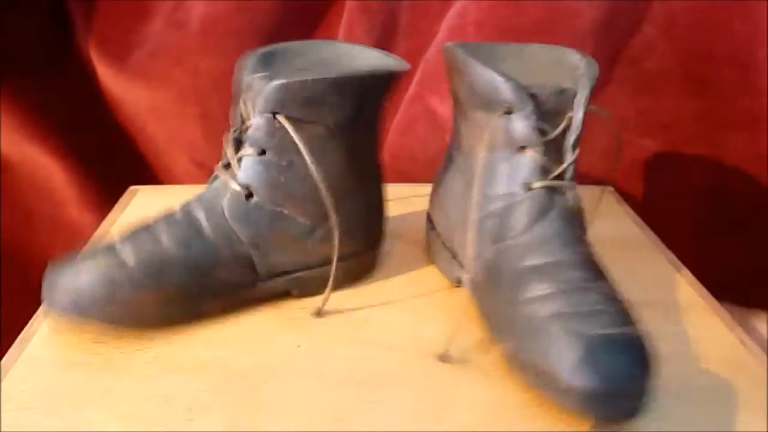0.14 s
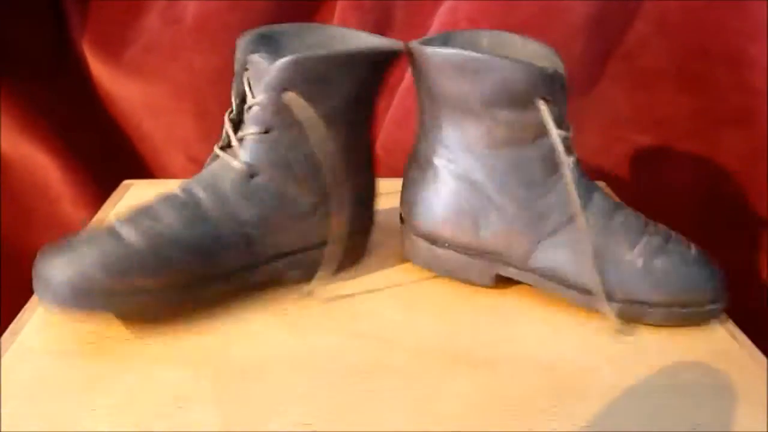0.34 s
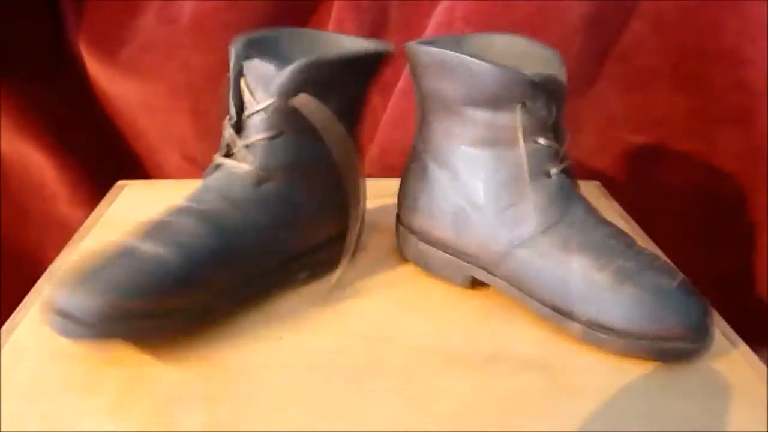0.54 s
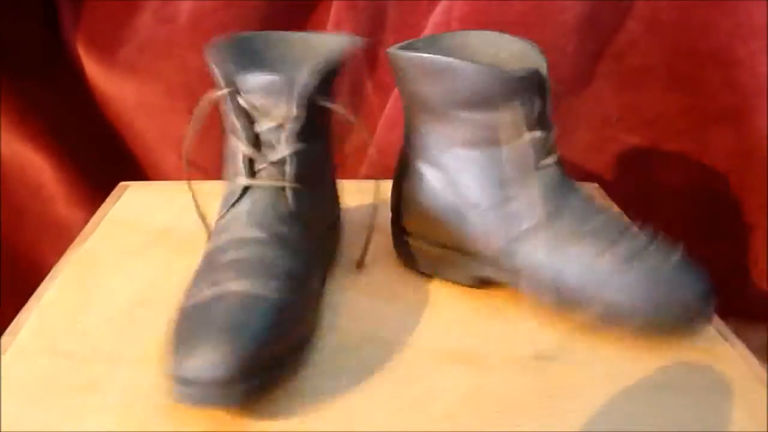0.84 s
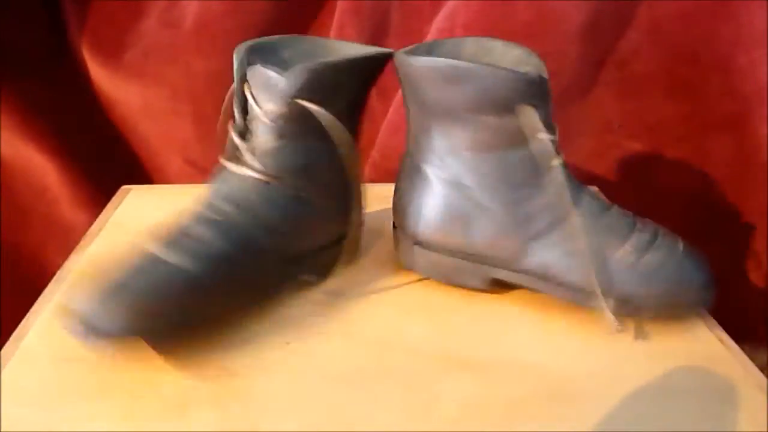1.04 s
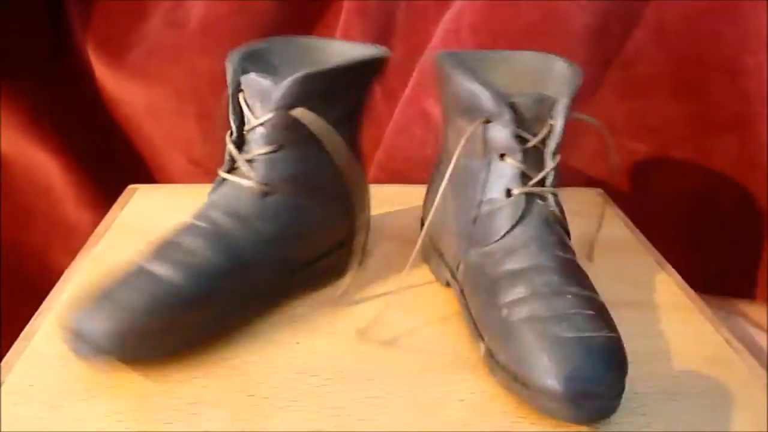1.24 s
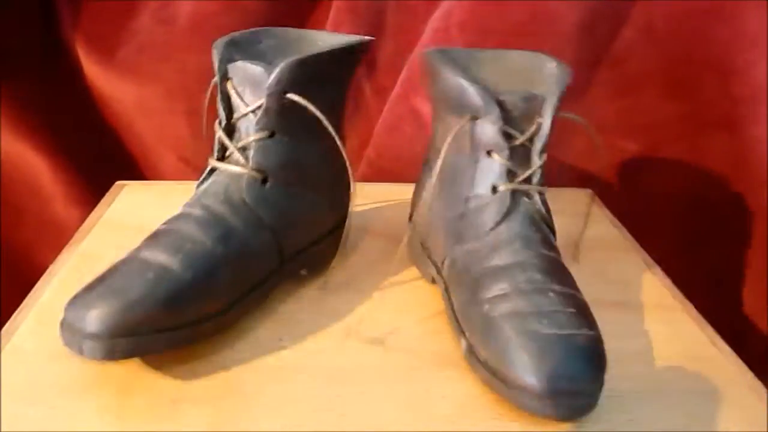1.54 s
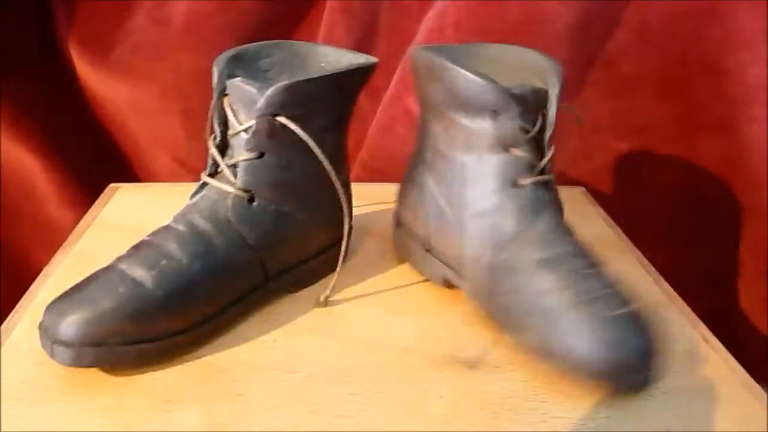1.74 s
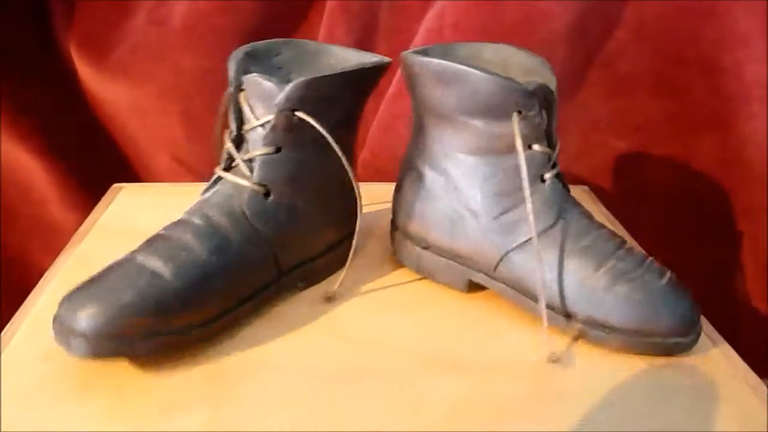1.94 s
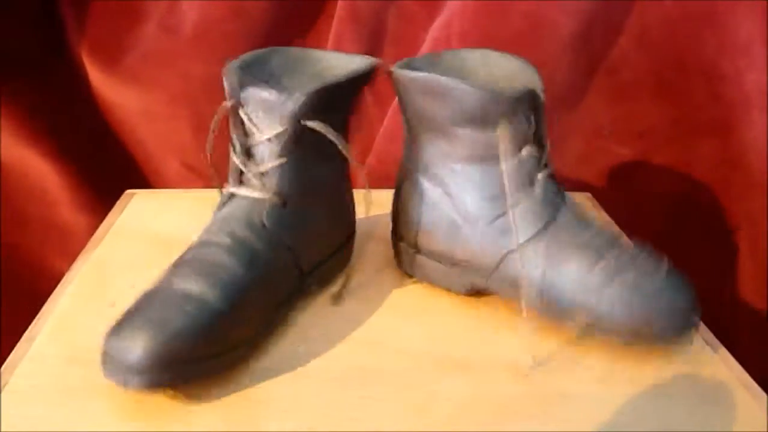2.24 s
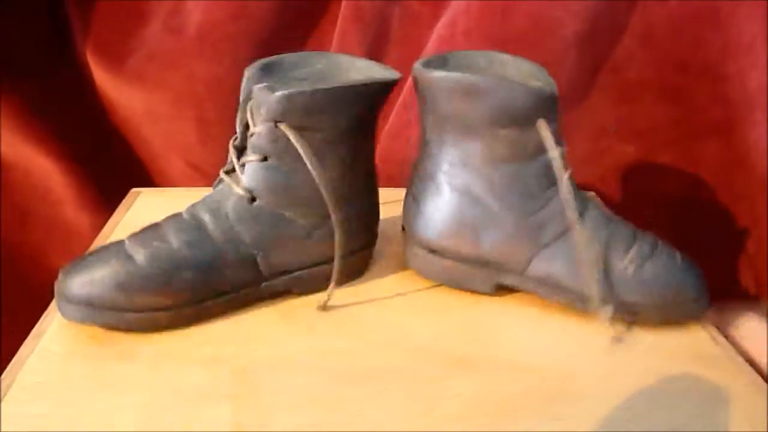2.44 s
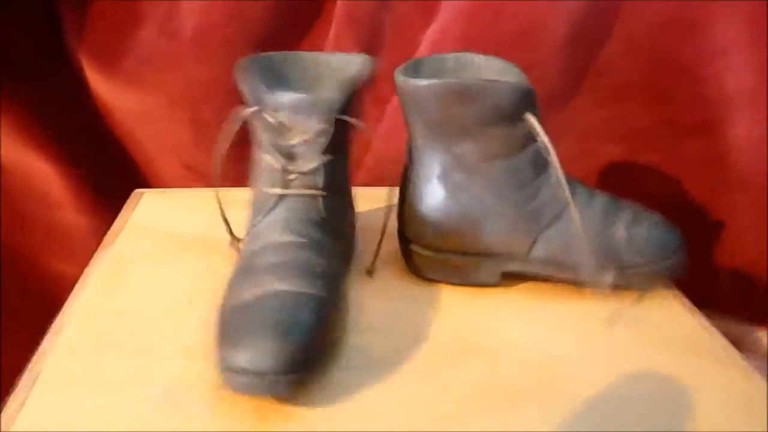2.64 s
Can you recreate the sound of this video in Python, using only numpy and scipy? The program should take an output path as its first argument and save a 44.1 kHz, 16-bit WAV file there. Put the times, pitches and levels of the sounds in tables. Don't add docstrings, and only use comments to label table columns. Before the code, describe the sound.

A wooden mechanical toy knocks and clatters on its hollow box: soft low bumps, sharper taps and loose rattles over creaky friction, nearly stopping late and restarting; close, slightly dull microphone, quiet room with light hiss.

```python
import sys
import numpy as np
from scipy import signal
from scipy.fft import rfft, irfft, next_fast_len
from scipy.io import wavfile

SR = 44100
rng = np.random.default_rng(int(sys.argv[2]) if len(sys.argv) > 2 else 0)


def natural_amplitude(level_db):
    exponent = np.asarray(level_db, float) / 20
    return 10 ** exponent


def put_to_file(sound):
    columns = np.atleast_2d(sound).T
    safe = np.clip(columns, -1, 1)
    whole_steps = np.round(safe * 32767)
    wavfile.write(sys.argv[1], SR, whole_steps.astype(np.int16))


N = 123039
SPREAD_DB = 4.5


def rms_one(x):
    return x / np.sqrt(np.mean(x ** 2) + 1e-20)


def ring(clicks, hz, t60):
    r = natural_amplitude(-60 / (t60 * SR))
    w = 2 * np.pi * hz / SR
    return signal.lfilter([0, np.sin(w)], [1, -2 * r * np.cos(w), r * r], clicks + 1e-18)


def click_train(start_s, gains):
    return np.bincount((start_s * SR).astype(int), gains, N)[:N]


def fading_clicks(start_s, gains, fade_s):
    return signal.lfilter([1], [1, -np.exp(-1 / (fade_s * SR))], click_train(start_s, gains))


def band_noise(source, low_hz, high_hz):
    band = signal.butter(1, [low_hz, high_hz], "band", fs=SR, output="sos")
    return signal.sosfilt(band, source)


def off_pitch_db(hz, favoured_hz, focus_db, reach_db):
    return -np.minimum(focus_db * np.log2(hz / favoured_hz) ** 2, reach_db)


# start in seconds, peak in dB, favoured pitch in
# Hz, length of push in seconds.
THUDS = [(0.0, -20, 440, 0.0022), (0.046, -8, 350, 0.0035), (0.065, -22.5, 340, 0.0023),
         (0.141, -12.5, 342, 0.0018), (0.154, -21.5, 297, 0.002), (0.27, -34, 347, 0.0028),
         (0.31, -26.5, 423, 0.0014), (0.38, -19, 336, 0.0046), (0.425, -25, 404, 0.0045),
         (0.491, -23.5, 409, 0.002), (0.509, -22, 435, 0.003), (0.523, -21.5, 417, 0.009),
         (0.551, -12, 350, 0.0035), (0.574, -12.5, 350, 0.001), (0.611, -23, 363, 0.003),
         (0.629, -24, 340, 0.0022), (0.674, -32.5, 234, 0.003), (0.7, -23, 357, 0.0015),
         (0.8, -34, 385, 0.003), (0.819, -20, 416, 0.0039), (0.864, -20.5, 377, 0.003),
         (0.875, -14.5, 326, 0.0059), (0.889, -16, 404, 0.0033), (0.903, -23.5, 373, 0.003),
         (0.913, -17.5, 455, 0.0023), (0.929, -14.5, 468, 0.0014), (0.964, -6.5, 350, 0.0034),
         (0.978, -13.5, 358, 0.0038), (1.051, -22, 400, 0.0075), (1.103, -25.5, 372, 0.0016),
         (1.12, -11, 528, 0.0039), (1.138, -11.5, 345, 0.0048),
         (1.183, -8, 333, 0.0043), (1.207, -12, 375, 0.0011), (1.255, -19, 385, 0.0056),
              (1.27, -15.5, 411, 0.0054), (1.286, -16, 289, 0.0052), (1.297, -13, 417, 0.0051),
              (1.355, -21, 443, 0.0072), (1.367, -14.5, 392, 0.0064), (1.388, -13.5, 337, 0.0021),
              (1.405, -21.5, 345, 0.0045), (1.488, -17, 426, 0.0013), (1.512, -17.5, 352, 0.004),
              (1.546, -6.5, 342, 0.0022), (1.565, -16, 358, 0.0054), (1.586, -16.5, 383, 0.0033),
              (1.656, -16.5, 340, 0.003), (1.671, -6.5, 384, 0.0043), (1.692, -13.5, 414, 0.0036),
              (1.788, -23.5, 396, 0.0044), (1.932, -27.5, 410, 0.0048), (1.976, -26, 353, 0.0041),
         (2.075, -20.5, 382, 0.0043), (2.092, -37, 397, 0.0059), (2.134, -21, 242, 0.002),
             (2.203, -19.5, 423, 0.0052), (2.248, -21.5, 370, 0.003), (2.271, -17, 500, 0.0044),
             (2.278, -27, 404, 0.0056), (2.3, -19.5, 398, 0.0051), (2.333, -21, 382, 0.0062),
             (2.356, -13, 480, 0.0053), (2.365, -10.5, 345, 0.0036), (2.375, -26, 376, 0.0024),
             (2.406, -11.5, 323, 0.0019), (2.452, -18, 416, 0.004), (2.472, -17.5, 550, 0.0012),
             (2.492, -15.5, 334, 0.0019), (2.585, -22, 404, 0.0023), (2.62, -20, 540, 0.0028),
             (2.666, -15.5, 347, 0.0063), (2.685, -7.5, 436, 0.0035), (2.758, -16, 327, 0.0078),
             (2.773, -12.5, 424, 0.007)]
# pitch in Hz, level in dB, 60 dB decay in seconds.
BOX = [(125, -17, 0.23), (181.6, -11, 0.21), (241.5, -3.5, 0.12), (350, -18, 0.017), (360.2, -2, 0.11),
       (355.5, -2.5, 0.028), (400, -3.5, 0.17), (472.4, -21, 0.0082), (530.7, -2.5, .12)]
BOX_SIGNS = [1, -1, -1, -1, 1, 1, 1, -1, -1]


def thuds():
    soft_hz, choke_s = 860, 0.03
    free_push_s, least_ring = 0.0038, 0.9
    rows = THUDS
    hz, level_db, t60 = np.transpose(BOX)[:, :, None]
    t = np.arange(SR // 4) / SR
    luck = np.clip(rng.standard_normal((len(rows), len(BOX), 1)), -1.5, 1.5)
    modes = natural_amplitude(level_db) * np.sin(2 * np.pi * hz * t) * np.array(BOX_SIGNS)[:, None]
    gaps_s = np.diff([row[0] for row in rows], append=N / SR + 1)
    out = np.zeros(N + SR)
    for (start_s, db, pitch_hz, push_s), chance, gap_s in zip(rows, luck, gaps_s):
        gain = natural_amplitude(db + off_pitch_db(hz, pitch_hz, 61.5, 12.5) + SPREAD_DB * chance)
        ring_length = np.clip(push_s / free_push_s, least_ring, 1.2)
        decay = natural_amplitude(-60 * t / t60 / ring_length)
        swell = 1 - np.exp(-t / max(0.74 * push_s, 1e-4))
        choke = np.exp(-np.maximum(t - gap_s, 0) / choke_s)
        out[int(start_s * SR):][:len(t)] += (gain * decay * modes).sum(axis=0) * swell * choke
    r = np.exp(-2 * np.pi * soft_hz / SR)
    return signal.lfilter([(1 - r) ** 2], [1, -2 * r, r * r], out[:N])


def strike(modes, start_s, db, colour_db):
    out = 0
    luck = np.clip(rng.standard_normal((len(start_s), len(modes))), -1.5, 1.5)
    for k, (hz, level_db, t60) in enumerate(modes):
        gain = natural_amplitude(db + level_db + colour_db(hz) + SPREAD_DB * luck[:, k])
        out = out + ring(click_train(start_s, gain * (-1) ** k), hz, t60)
    return out


# start in seconds, panel knock in dB, peg tick in dB, favoured pitch in Hz.
TAPS_EARLY = [(0.001, -24.5, -32.5, 860), (0.047, -18.5, -42.5, 1080), (0.14, -18, -31, 760),
              (0.179, -50, -44.5, 1110), (0.271, -36, -57, 1110), (0.309, -22, -42.5, 970),
              (0.373, -29, -53, 904), (0.489, -20.5, -41, 1790), (0.554, -9, -16.5, 775),
              (0.566, -20, -33.5, 1123), (0.584, -15.5, -35, 1145), (0.612, -24, -37.5, 1120),
              (0.676, -18, -41, 780), (0.699, -30, -43.5, 1110), (0.791, -30, -48.5, 976),
              (0.859, -33.5, -47, 810), (0.876, -19.5, -41, 1690), (0.888, -30, -39.5, 660),
              (0.924, -16.5, -62, 1023), (0.93, -17.5, -54, 597), (0.938, -17.5, -36, 986),
              (0.963, -31.5, -32.5, 638), (0.978, -11, -40, 931), (1.118, -18.5, -41.5, 970),
              (1.137, -22, -33.5, 970), (1.183, -13.5, -30.5, 1110), (1.196, -34, -46.5, 1126),
              (1.215, -21.5, -39, 970), (1.261, -24, -45.5, 1106), (1.296, -23.5, -49.5, 974)]
TAPS_LATE = [(1.357, -24.5, -48.5, 1060), (1.374, -21.5, -37, 622), (1.387, -10.5, -24, 1080),
             (1.401, -37.5, -39.5, 1130), (1.489, -25, -40, 1020), (1.5, -23, -38, 991),
             (1.545, -11.5, -27, 740), (1.556, -19, -50, 1130), (1.584, -24, -48.5, 713),
             (1.67, -14, -20.5, 1110), (1.979, -37.5, -84.5, 622), (2.059, -18.5, -52.5, 802),
             (2.065, -23.5, -53.5, 1100), (2.076, -34, -45.5, 848), (2.137, -34, -55.5, 875),
             (2.197, -29.5, -47.5, 859), (2.206, -26, -46, 953), (2.252, -24, -39.5, 1680),
             (2.264, -20.5, -32, 1010), (2.293, -34, -49.5, 1800), (2.332, -30, -37.5, 1800),
             (2.344, -23.5, -39, 999), (2.365, -14, -31, 735), (2.373, -12.5, -35, 953),
             (2.409, -28.5, -45, 972), (2.476, -11.5, -29, 1590), (2.507, -24.5, -56, 1110),
             (2.557, -34.5, -48.5, 1580), (2.589, -21.5, -68, 956), (2.673, -20, -34, 942),
             (2.765, -23.5, -48, 662)]
# pitch in Hz, level in dB, 60 dB decay in seconds.
PANEL = [(638, 0, 0.026), (712, -1.5, 0.042), (766, 5.5, 0.018), (963, -3, 0.067), (1022, -7.5, 0.07),
         (1112.5, -2, 0.058), (1406, -4.5, 0.039), (1580, -2.5, 0.048), (1785, 1, 0.017),
         (1962, -3.5, 0.026)]
PEGS = [(hz, 0, 23.7 / hz) for hz in np.geomspace(2500, 7200, num=9)]


def taps():
    chatter_s, chatter_loss_db = 0.001985, 5.5
    usual_hardness_db, brightest_db, crack_s = -24, -4, 0.00033
    rows = np.repeat(TAPS_EARLY + TAPS_LATE, 3, axis=0)
    start_s, knock_db, tick_db, pitch_hz = rows.T
    hardness_db = np.maximum(tick_db - knock_db - usual_hardness_db, -15)
    tilt_db = np.minimum(-5 + 0.28 * hardness_db, brightest_db)
    bounce = np.tile(np.arange(3), len(rows) // 3)
    start_s = start_s + bounce * chatter_s * rng.uniform(0.3654, 1.618, len(bounce))
    knock_db = knock_db - chatter_loss_db * bounce
    tick_db = tick_db - chatter_loss_db * bounce

    def place_db(hz):
        return off_pitch_db(hz, pitch_hz, 46.5, 4.5)

    def hardness_colour_db(hz):
        return tilt_db * np.log2(hz / 4700)

    fall = fading_clicks(start_s, natural_amplitude(tick_db + tilt_db), crack_s)
    crack = band_noise(fall * rng.standard_normal(N), 2500, 5500)
    knock = strike(PANEL, start_s, knock_db - 9, place_db)
    tick = strike(PEGS, start_s, tick_db - 1.5, hardness_colour_db)
    return knock + tick + crack


def clatter():
    fade_s, level_db, grains_per_s = 0.017, -7.5, 500
    start_s, knock_db = np.transpose(TAPS_EARLY + TAPS_LATE)[:2]
    shake = fading_clicks(start_s, natural_amplitude(knock_db + level_db), fade_s)
    grains = shake * rng.uniform(-1.07, 1, N) * (rng.random(N) < grains_per_s / SR)
    modes = PANEL[1:] + PEGS[:4]
    dealt = rng.integers(0, len(modes), N)
    out = 0
    for k, (hz, _, t60) in enumerate(modes):
        gain = natural_amplitude(-4.0 * np.log2(hz / 1000))
        out = out + ring(grains * (dealt == k) * gain, hz, 0.53 * t60)
    return out


def rubbed(modes, grains):
    out = 0
    for k, (hz, db, t60) in enumerate(modes):
        out = out + natural_amplitude(db) * ring(grains, hz, t60) * (-1) ** k
    return rms_one(out)


# time in seconds, level in dB.
RUB = [(0, -29.5), (.22, -37.5), (0.45, -43), (0.619, -35), (.77, -40.5), (0.899, -34.5), (1.06, -37.5),
       (1.298, -33), (1.521, -33), (1.631, -33), (1.761, -39.5), (1.899, -81), (2.04, -48), (2.096, -28),
       (2.178, -43.5), (2.299, -35), (2.529, -33), (2.79, -34.5)]


def rub():
    grains_per_s = 380
    time_s, db = np.transpose(RUB)
    sizes = natural_amplitude(3.75 * np.minimum(rng.exponential(1, N), 3)) * rng.choice([-1, 1], N)
    grains = sizes * (rng.random(N) < grains_per_s / SR)
    hiss = rms_one(band_noise(rng.standard_normal(N), 1500, 6000))
    mix = natural_amplitude(-2.5) * rubbed(BOX, grains) + natural_amplitude(-14.5) * rubbed(PANEL, grains)
    mix = mix + natural_amplitude(-30.5) * rubbed(PEGS, grains) + natural_amplitude(-23) * hiss
    return natural_amplitude(np.interp(np.arange(N) / SR, time_s, db)) * mix


def room(x):
    t60_s, wall_cut_hz = 0.15, 5900
    size = next_fast_len(N + SR)
    w = 2 * np.pi * np.arange(size // 2 + 1) / size
    dull = np.exp(-2 * np.pi * wall_cut_hz / SR)
    wall = (1 - dull) / (1 - dull * np.exp(-1j * w))
    total = 0
    for k, lag in enumerate((rng.uniform(0.012, 0.035, 10) * SR).astype(int)):
        loop = natural_amplitude(-60 * lag / SR / t60_s) * wall * np.exp(-1j * w * lag)
        total = total + (-1) ** k * loop / (1 - loop)
    return irfft(rfft(x, size) * total, size)[:N]


# frequency in Hz, density in dB per Hz.
FLOOR = [(20, 1.5), (33, -36), (52, -8), (80, -20), (400, -15), (900, -31), (3000, -36.5), (7000, -46)]


def floor():
    hz = np.fft.rfftfreq(N, 1 / SR)
    table_hz, table_db = np.transpose(FLOOR)
    shape = natural_amplitude(np.interp(np.log(hz + 1), np.log(table_hz), table_db)) * (hz > 20)
    return natural_amplitude(-49) * rms_one(irfft(rfft(rng.standard_normal(N)) * shape, N))


def scene():
    toy = thuds() + taps() + clatter() + rub()
    return (toy + natural_amplitude(-17.5) * room(toy) + floor())[None]


def band_limit(x):
    return signal.sosfilt(signal.butter(12, 8140, fs=SR, output="sos"), x)


def record(dry):
    top_cut = signal.cheby1(10, 0.5, 7377, fs=SR, output="sos")
    mix = signal.sosfilt(top_cut, dry) + 0.018
    return band_limit(mix)


dry = scene()
out = record(dry)
put_to_file(out)
```